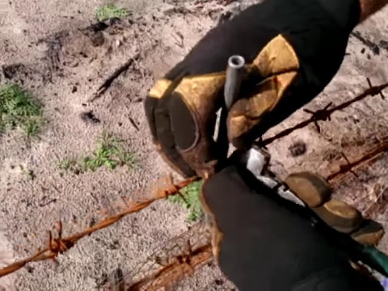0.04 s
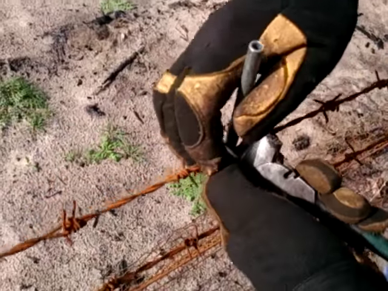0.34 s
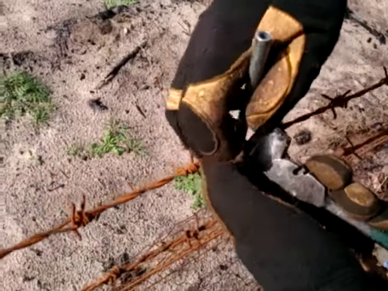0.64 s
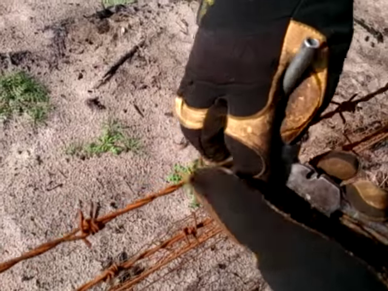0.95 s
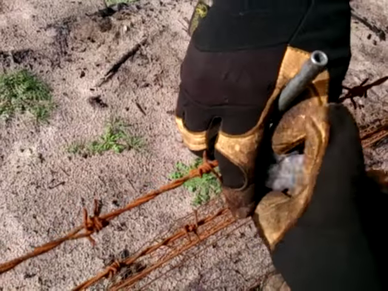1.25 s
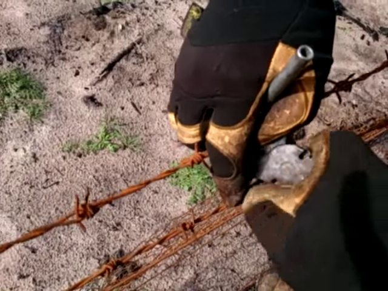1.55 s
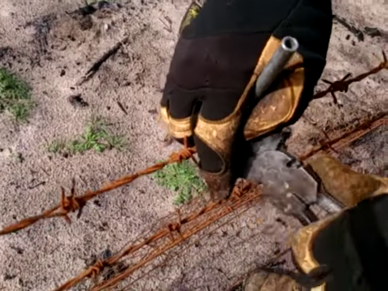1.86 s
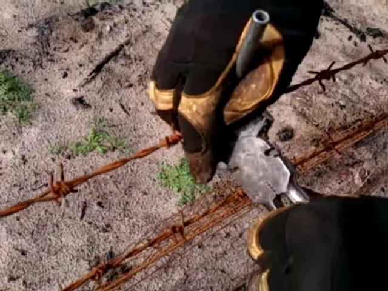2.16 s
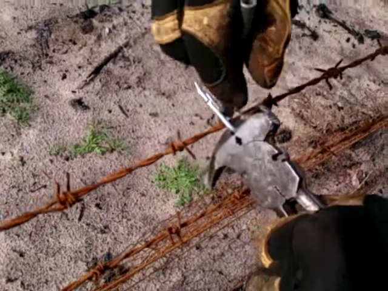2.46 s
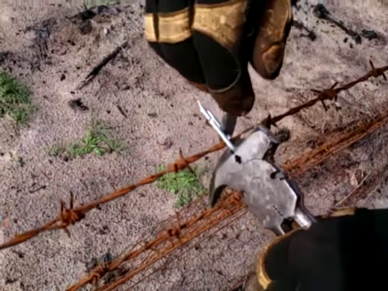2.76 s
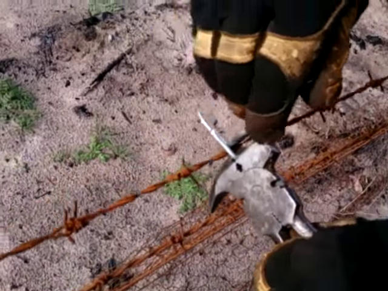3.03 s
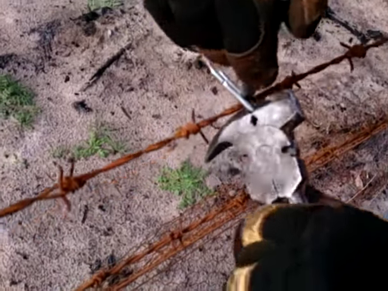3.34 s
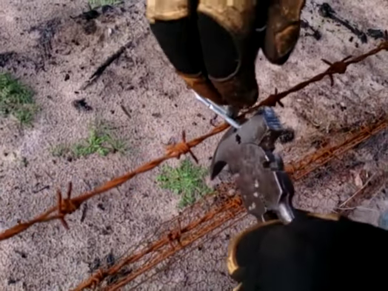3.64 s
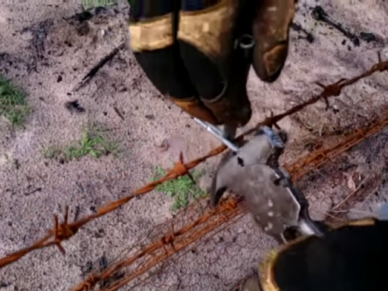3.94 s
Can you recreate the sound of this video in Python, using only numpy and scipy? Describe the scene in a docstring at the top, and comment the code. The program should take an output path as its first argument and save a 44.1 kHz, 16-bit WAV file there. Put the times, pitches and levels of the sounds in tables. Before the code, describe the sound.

Wind rumbles, thumps and pops on the microphone outdoors, mostly on the right. Under it, close by, steel pliers give small dry clicks on barbed wire and gloves rub softly. A distant bird whistles faintly twice.

```python
"""Wind over fence work.

Out in the open, wind rumbles, flutters, thumps and pops on the microphone's two ports, mostly the right.
Close by, under the buffeting, gloved hands work steel pliers and a wire clip on barbed wire: the steel
gives small dry clicks, the gloves rub and catch. Far off, a bird whistles twice over faint outdoor air."""
import sys
import numpy as np
from scipy import signal
from scipy.fft import rfft, irfft
from scipy.io import wavfile
from scipy.ndimage import uniform_filter1d, map_coordinates

SR = 44100
rng = np.random.default_rng(int(sys.argv[2]) if len(sys.argv) > 2 else 0)


def dump(signal):
    """Clip the signal to [-1, 1] and save it as 16-bit WAV at the path in sys.argv[1]."""
    limited = np.clip(np.atleast_2d(signal).T, -1, 1)
    pcm = np.round(limited * 32767).astype(np.int16)
    wavfile.write(sys.argv[1], SR, pcm)


N = 176400

# The wind's push on each microphone port. Each row: time in seconds, relative level in dB.
LEFT_PORT_PUSH = [(0, -23.5), (.09, -58), (.17, -40), (.3, -29.5), (.7, -34), (.95, -28), (1.2, -41.5),
                  (1.32, -24.5), (1.53, -31), (1.6, -33.5), (1.76, -61.5), (2.05, -42), (2.65, -34.5),
                  (2.9, -51.5), (2.99, -75), (3.13, -43), (3.28, -38), (3.42, -42.5), (3.65, -57),
                  (3.73, -38), (4, -40.5)]
RIGHT_PORT_PUSH = [(0, -22.5), (.22, -25.5), (0.332, -19), (.5, -20), (.66, -22.5), (.85, -20.5),
                   (.95, -22), (1.22, -31), (1.4, -22.5), (1.52, -28.5), (1.58, -45), (1.68, -40),
                   (1.74, -28), (1.95, -30.5), (2.109, -26), (2.151, -18), (2.28, -22), (2.319, -16.5),
                   (2.459, -22.5), (2.505, -22.5), (2.55, -14), (2.68, -34.5), (2.752, -52.5),
                   (2.92, -34.5), (3.134, -19.5), (3.29, -28.5), (3.432, -42.5), (3.571, -17), (3.651, -40),
                   (4, -30.5)]
# Eddies striking a port. Each row: centre in seconds, half-width in seconds, level in dB, port L or R.
EDDY_STRIKES = [(0.036, 0.0056, -17.5, "R"), (0.091, 0.021, -21, "L"), (0.098, 0.016, -18.5, "R"),
                (.137, .03, -23, "R"), (0.196, .015, -25.5, "R"), (0.232, 0.016, -29.5, "R"),
                (0.259, 0.018, -35, "L"), (.26, 0.012, -22, "R"), (0.282, 0.012, -21.5, "R"),
                (0.333, 0.018, -17, "R"), (0.331, 0.017, -22, "L"), (0.364, .012, -13, "R"),
                (0.394, 0.025, -24.5, "R"), (0.459, 0.021, -25.5, "R"), (0.488, 0.014, -31, "R"),
                (0.523, 0.03, -32, "L"), (0.528, 0.01, -23.5, "R"), (0.569, 0.02, -28, "L"),
                (.575, 0.029, -18, "R"), (0.614, 0.02, -15, "R"), (0.703, 0.02, -24.5, "R"),
                (0.763, .014, -26, "L"), (0.785, .018, -15, "R"), (0.788, 0.019, -26, "L"),
                (0.85, 0.025, -19, "R"), (0.903, 0.015, -25, "L"), (0.909, 0.013, -22.5, "R"),
                (0.929, 0.021, -18.5, "R"), (0.934, .015, -30, "L"), (0.988, 0.017, -25.5, "R"),
                (1.061, 0.016, -24, "L"), (1.137, 0.015, -29.5, "L"), (1.194, 0.015, -30.5, "L"),
                (1.24, 0.01, -64, "L"), (1.32, 0.019, -20.5, "L"), (1.39, 0.037, -25.5, "R"),
                (1.459, 0.022, -23, "L"), (1.494, 0.017, -25.5, "L"), (1.524, .013, -25, "L"),
                (1.728, 0.036, -23.5, "R"), (1.777, 0.013, -25.5, "R"), (1.815, 0.016, -28.5, "R"),
                (1.997, 0.021, -28.5, "R"), (2.074, .017, -32.5, "L"), (2.135, .02, -23, "R"),
                (2.203, 0.014, -40, "R"), (2.323, .032, -17, "R"), (2.366, .013, -21, "R"),
                (2.415, 0.02, -24, "R"), (2.476, 0.015, -30.5, "R"), (2.529, 0.015, -16.5, "R"),
                (2.594, 0.023, -23.5, "R"), (2.873, 0.021, -35.5, "L"), (3.01, 0.02, -29.5, "R"),
                (3.133, 0.032, -17, "R"), (3.142, .014, -31.5, "L"), (3.19, .014, -26.5, "R"),
                (3.213, 0.014, -22.5, "R"), (3.267, 0.036, -25.5, "R"), (3.266, 0.018, -30.5, "L"),
                (3.528, 0.025, -36.5, "R"), (3.569, 0.026, -29, "R"), (3.644, 0.0073, -23.5, "R"),
                (3.707, 0.016, -35, "L"), (3.779, .025, -35, "R"), (3.878, 0.011, -30, "R"),
                (3.942, 0.019, -39.5, "L")]
# Gusts slapping the right port. Each row: start in seconds, peak in dB, rise time in seconds.
GUST_THUMPS = [(0.319, -12, 0.0049), (.48, -2.5, 0.0044), (0.837, -5.5, 0.0045), (0.898, -5.5, 0.01),
               (2.123, -8, 0.0058), (2.294, -5, 0.0044), (2.364, -11, 0.0021), (2.405, -18.5, 0.0014),
               (2.514, -2, 0.0049), (2.533, -13, 0.0013), (2.581, -6.5, 0.0037), (3.182, -15, 0.005),
               (3.212, -16.5, 0.0023), (3.572, -10, 0.0025)]
# The hardest jolts on the right port. Each row: start in seconds, peak in dB, cut-off in Hz.
PORT_POPS = [(0.0404, -28.5, 720), (0.089, -21.5, 1490), (.258, -20, 970), (0.2832, -20, 980),
             (.3172, -19, 1400), (0.3244, -15, 12200), (.331, -10, 1340), (.338, -10.5, 1200),
             (.3672, -3.5, 11800), (.455, -28.5, 900), (.4875, -23, 8000), (0.6108, -14, 1040),
             (0.6112, -23.5, 11900), (0.7794, -24.5, 1010), (0.8414, -15.5, 10300), (.858, -26, 1000),
             (.904, -23.5, 990), (1.489, -31, 900), (2.128, -28, 795), (2.299, -20.5, 4070),
             (2.31, -21, 790), (2.32, -30, 686), (2.408, -27, 800), (2.505, -30, 7000), (2.529, -16, 2000),
             (3.116, -21, 950), (3.125, -15.5, 1100), (3.1428, -13.5, 3020)]
# The tone of a pop before its cut-off. Each row: frequency in Hz, gain in dB.
POP_SPECTRUM = [(100, -15.5), (400, 15.5), (850, 5), (1400, -6.5), (2200, -15), (4000, -23.5),
                (8000, -35.5), (12000, -38.5), (16000, -56)]

# Steel touching wire, close to the microphone. Each row: start in seconds, bright ring and low knock
# in relative dB, knock centre in Hz, left minus right in dB, contact decay time in seconds.
STEEL_CONTACTS = [(0.094, -53.5, -56, 2950, 16, .001), (0.194, -60, -57, 1700, 6, 0.00089),
                  (.682, -51, -65, 3000, 7, .0008), (.75, -53, -68, 3000, 4, 0.00077),
                  (.7652, -44, -48.5, 2180, -3, .002), (.902, -59, -52, 2940, -6, 0.0016),
                  (.964, -51.5, -61, 3050, -1, 0.00092), (1.032, -52, -51.5, 2020, 2, 0.0037),
                  (1.4075, -33, -45, 3500, 9, 0.00041), (1.42, -56, -48.5, 4940, 3, 0.0048),
                  (1.535, -39.5, -57, 4840, 5.5, 0.0023), (1.562, -48.5, -38, 1710, 0.5, 0.003),
                  (1.673, -38.5, -57, 1700, 11, 0.0011), (1.868, -44, -74, 3000, 10, 0.0027),
                  (1.984, -44, -53.5, 3430, -2.5, 0.0054), (2.034, -51, -64, 3000, 14, .001),
                  (2.064, -57.5, -69, 3000, 8, .001), (2.221, -67, -62, 1800, 6, .001),
                  (2.279, -54, -52, 1800, 1, 0.0028), (2.338, -47.5, -53, 4020, 11, 0.0088),
                  (2.353, -61, -41, 2190, -6, 0.0009), (2.5865, -38.5, -39.5, 4300, 1.5, 0.0029),
                  (2.667, -55, -43.5, 1400, 0, 0.0022), (3.029, -39.5, -33.5, 2030, 0.5, .0016),
                  (3.3885, -36.5, -48, 2500, -7, 0.002), (3.634, -79, -54, 2760, 12, 0.0037),
                  (3.649, -39.5, -40.5, 2700, 2, 0.0013)]
# Modes of the gripped pliers and taut wire. Each row: frequency in Hz, relative level in dB,
# seconds to fall by 60 dB.
GRIPPED_MODES = [(900, 4, 0.0089), (1480, 4.5, 0.0082), (2280, -1.5, 0.0035), (3050, 5.5, 0.0036),
                 (3920, 2.5, 0.0024), (4660, 11, 0.002), (5840, -19.5, 0.0017), (7270, 13.5, 0.01),
                 (8170, 6.5, 0.023), (8860, 12, 0.0079), (9480, 17, 0.0065), (10820, 16, 0.0025),
                 (12200, 3, 0.0034), (13200, 3, 0.0036), (14400, 7, 0.0038)]
# Gloves sliding on wire and steel. Each row: peak time, rise and fall in seconds, hiss level in dB,
# dull rub level in dB, left minus right of the hiss in dB.
GLOVE_STROKES = [(.33, 0.034, 0.056, -74, -60.5, 1), (.49, 0.026, 0.21, -75.5, -63, 0),
                 (.72, 0.07, 0.064, -65, -65.5, 9), (0.845, 0.0044, 0.0046, -70, -58, -6),
                 (.89, .02, 0.034, -78, -60, 12), (1.035, 0.011, 0.051, -56, -60, 9),
                 (1.42, 0.01, 0.0039, -49, -53.5, 19), (1.6, 0.13, 0.03, -78, -62, 14),
                 (1.68, 0.052, 0.063, -64.5, -56, 16), (1.864, 0.016, 0.017, -55, -61.5, 7),
                 (1.92, 0.028, 0.045, -58, -63, 14), (2.16, 0.019, 0.023, -69, -65, 11),
                 (2.26, 0.033, 0.03, -94, -74, -1), (2.343, 0.046, 0.048, -59.5, -57, 11),
                 (2.47, 0.027, 0.03, -61, -85, 14), (2.555, .02, .025, -61.5, -65, 4),
                 (2.62, 0.035, 0.022, -61, -80, 13), (3.04, 0.0094, 0.034, -81, -57, -5),
                 (3.147, .0015, 0.0061, -76, -58, -10), (3.42, 0.059, 0.024, -68.5, -96, 16),
                 (3.58, 0.025, 0.024, -66, -77, 19)]
# A glove dragging over twisted wire. Each row: start and end in seconds, catches per second, level in dB.
GLOVE_DRAGS = [(0.091, .2, 48, -69.5), (2.164, 2.37, 45, -64), (2.494, 2.593, 40, -59.5)]
# The tone of the gloves' hiss, rub and catches. Each row: frequency in Hz, relative density in dB.
HISS_SPECTRUM = [(2000, -21.5), (4400, 6.5), (6600, -0.5), (8000, 8), (9700, 13.5), (11000, 4),
                 (14500, -4.5), (16000, -10)]
RUB_SPECTRUM = [(300, 15.5), (900, 8), (1700, 7), (3000, 4.5), (4800, 0), (6500, -1.5), (12000, -12)]
CATCH_SPECTRUM = [(400, -2), (1100, 9.5), (1900, 3.5), (3000, -2.5), (4600, -14), (9000, -13), (16000, -57)]

# A distant bird. Each row: start and length in seconds, first and last pitch in Hz, level in dB.
BIRD_WHISTLES = [(2.007, .1, 1220, 1205, -58.5), (2.723, 0.205, 1426, 1310, -66.5)]
# The hiss of the open field. Each row: frequency in Hz, relative density in dB.
AIR_SPECTRUM = [(100, 26), (400, 6.5), (1000, 4), (2200, 0), (4800, -2.5), (6400, -6), (9500, -6),
                (13000, -12.5), (16000, -18)]

WIND_REF_DB = -22  # rumble and eddies brighten above this level and dull below it


def undb(db):
    """Decibels to gain."""
    return 10 ** (np.asarray(db) / 20)


def unit(x):
    """Scale to rms 1."""
    return x / np.sqrt(np.mean(x ** 2) + 1e-20)


def panned(db):
    """Left and right gains for a level difference, at constant power."""
    return unit(undb(np.array([[db], [-db]]) / 2))


def add(out, x, start_s):
    """Mix x into out from a given time."""
    i = int(start_s * SR)
    a, b = max(i, 0), min(i + x.shape[-1], N)
    out[..., a:b] += x[..., a - i:b - i]


def response(points, size):
    """Gain on the FFT grid from (Hz, dB) points."""
    hz, db = np.array(points).T
    return undb(np.interp(np.log(np.fft.rfftfreq(size, 1 / SR) + 1), np.log(hz), db))


def noise(points):
    """Coloured noise, unrelated left and right."""
    return unit(irfft(rfft(rng.standard_normal((2, N))) * response(points, N), N))


def wander(rate):
    """Smooth random drift of rms 1, with `rate` new values a second."""
    hold = max(int(SR / rate), 1)
    return unit(uniform_filter1d(rng.standard_normal(N)[np.arange(N) // hold], hold))


def wind_rumble(gain_db=2, flutter_db=5, knees_hz=(94, 31.4)):
    """Turbulence on each microphone port: the harder the wind pushes, the higher its spectrum reaches."""
    t, f = np.arange(N) / SR, np.fft.rfftfreq(N, 1 / SR)
    half_octaves_hz = 20 * 2 ** (np.arange(13) / 2)
    out = np.zeros((2, N))
    for port, curve in enumerate((LEFT_PORT_PUSH, RIGHT_PORT_PUSH)):
        times, push_db = np.array(curve).T
        push = undb(np.interp(t, times, push_db) + gain_db + flutter_db * wander(28))
        cutoff_hz = 60 + 107 * (push / undb(WIND_REF_DB)) ** 0.83
        turbulence = rfft(rng.standard_normal(N))
        total, power = 0, 0
        for hz in half_octaves_hz:
            in_band = np.abs(np.log2((f + 1) / hz)) < 1 / 4
            band = unit(irfft(turbulence * in_band, N))
            # The spectrum is flat below the port's knee and falls above it.
            gain = np.sqrt(hz) / np.hypot(hz, knees_hz[port]) * np.exp(-hz / cutoff_hz)
            total += gain * band
            power += gain ** 2
        out[port] = push * total / np.sqrt(power)
    return out


def wind_eddies(low_cut_hz=105.4, knee_hz=210, jolt_db=3, size=8192):
    """Patches of turbulence sweep past a port in jolts, fastest mid-way; strong ones are brighter."""
    out = np.zeros((2, N))
    t, f = (np.arange(size) - size // 2) / SR, np.fft.rfftfreq(size, 1 / SR)
    jolts = undb(jolt_db * wander(260))
    port_tone = f ** 2 / (f ** 2 + low_cut_hz ** 2) / np.hypot(f, knee_hz)
    for centre, half_width, db, port in EDDY_STRIKES:
        cutoff_hz = 280.6 * undb(db - WIND_REF_DB) ** 0.35
        spectrum = port_tone * np.exp(-(f / cutoff_hz) ** 1.185)
        patch = irfft(rfft(rng.standard_normal(size)) * spectrum)
        swell = (1 + (t / half_width) ** 2 / 2) ** -5
        span = (int(centre * SR) + np.arange(size)) % N
        push = swell * uniform_filter1d(jolts[span], size=64)
        travel = np.cumsum(push ** 0.26)  # a harder push carries the patch past faster
        swept = map_coordinates(patch, [travel], mode="wrap")
        eddy = unit(swept * push) * np.sqrt(np.mean(swell ** 2))
        add(out["LR".index(port)], undb(db) * eddy, centre + t[0])
    return out


def wind_thumps(size=4096):
    """A gust slaps the right port with a low thump: the pressure jumps, then sags back past rest."""
    out, t = np.zeros((2, N)), np.arange(size) / SR
    for start, db, rise in GUST_THUMPS:
        pulse = np.gradient((t / rise) ** 3 * np.exp(-1.5 * t / rise))
        add(out[1], -undb(db) * pulse / pulse.max(), start)
    return out


def wind_pops(wake_db=-2, wake_s=0.003, size=1024):
    """A sudden pressure jump in the right port with a rough wake, over within milliseconds."""
    out, k, f = np.zeros((2, N)), np.arange(size), np.fft.rfftfreq(size, 1 / SR)
    causal_fold = np.where(k == 0, 1, 2 * (k < size // 2))
    for start, db, cutoff_hz in PORT_POPS:
        spectrum = response(POP_SPECTRUM, size) / np.hypot(1, (f / cutoff_hz) ** 3)
        cepstrum = irfft(np.log(spectrum))
        jump = np.exp(rfft(cepstrum * causal_fold))  # minimum phase packs the energy at the front
        wake = rng.standard_normal(size) * np.exp(-k / SR / wake_s)
        roughness = 1 + undb(wake_db) * rfft(wake / np.linalg.norm(wake))
        pulse = irfft(jump * roughness)
        add(out[1], -undb(db) * pulse / np.abs(pulse).max(), start)
    return out


def plier_clicks(knock_below_hz=6000, spread_db=2.5, crack_db=-12, echo_s=0.011, size=6144):
    """Close up, a brief gritty contact rings the steel, and the gloved grip damps it at once."""
    out, t = np.zeros((2, N)), np.arange(size) / SR
    hz, mode_db, t60 = np.array(GRIPPED_MODES).T[:, :, None]
    low = hz[:, 0] < knock_below_hz
    for start, ring_db, knock_db, knock_hz, pan_db, contact_s in STEEL_CONTACTS:
        spread, detune, phase = rng.standard_normal((3, len(hz), 1))
        grit, scatter = rng.standard_normal((2, 2, size))
        contact = np.exp(-t / contact_s)
        force = unit(grit * contact)
        mode_hz = hz * (1 + 0.02 * detune)
        modes = np.exp(-np.log(1000) * t / t60) * np.sin(2 * np.pi * (mode_hz * t + phase))
        off_centre_db = -6.5 * low[:, None] * np.log2(hz / knock_hz) ** 2
        modes *= undb(mode_db + spread_db * spread + off_centre_db)
        knock = unit(signal.fftconvolve(force, modes[low].sum(0)[None])[:, :size])
        ring = unit(signal.fftconvolve(force, modes[~low].sum(0)[None])[:, :size])
        click = undb(knock_db) * knock + undb(ring_db) * (ring + undb(crack_db) * force)
        # Ground and fence scatter back a short tail: bright for the ring, dull for the knock.
        for tone, echo_db in ((HISS_SPECTRUM, ring_db - 15.5), (RUB_SPECTRUM, knock_db - 4)):
            echo = irfft(rfft(scatter) * response(tone, size), size) * np.exp(-t / echo_s)
            click += undb(echo_db) * unit(echo)
        add(out, click * np.sqrt(np.mean(contact ** 2)) * panned(pan_db), start)
    return out


def glove_rubs(grain_db=2.5, snag_db=1):
    """Leather and cloth slide near the microphone: hiss over a dull rub, gritty as fibres catch."""
    out, t = np.zeros((2, N)), np.arange(N) / SR
    hiss, rub = noise(HISS_SPECTRUM), noise(RUB_SPECTRUM)
    for peak, rise, fall, hiss_db, rub_db, pan_db in GLOVE_STROKES:
        slope_s = np.where(t < peak, rise, fall)
        stroke = np.exp(-np.abs((t - peak) / slope_s) ** 0.82)
        out += stroke * (undb(hiss_db) * hiss * panned(pan_db) + undb(rub_db) * rub)
    grit = unit(undb(grain_db * wander(900) + snag_db * wander(60)))
    return out * grit


def glove_catches(decay_s=0.0035, spread_db=2, max_catches=24, size=1024):
    """A glove sticks and slips over twisted wire in an uneven run of tiny dry catches."""
    envelope = np.zeros(N)
    catch = np.exp(-np.arange(size) / SR / decay_s)
    for start, end, rate, db in GLOVE_DRAGS:
        jitter, strengths = rng.standard_normal((2, max_catches))
        times = start + (np.arange(max_catches) + 0.25 * jitter) / rate
        run_rms = np.sqrt(np.sum(catch ** 2) * rate / SR)
        for time, strength in zip(times, strengths):
            if time < end:
                add(envelope, undb(db + spread_db * strength) * catch / run_rms, time)
    bursts = envelope * rng.standard_normal((2, N))
    return irfft(rfft(bursts) * unit(response(CATCH_SPECTRUM, N)), N)


def far_bird(waver=0.024, pan_db=-20.5):
    """Soft, wavering, slightly falling whistles from far off to the right."""
    out = np.zeros(N)
    for start, length, first_hz, last_hz, db in BIRD_WHISTLES:
        n = int(length * SR)
        hz = np.linspace(first_hz, last_hz, n) * (1 + waver * wander(120)[:n])
        swell = np.sin(np.linspace(0, np.pi, n))
        add(out, undb(db) * swell * np.sin(2 * np.pi * np.cumsum(hz) / SR), start)
    return out * panned(pan_db)


def open_air(left_db=-62.5, right_db=-58):
    """The faint, even hiss of the field all around."""
    return noise(AIR_SPECTRUM) * undb([[left_db], [right_db]])


def scene():
    """Wind right on the microphone, the handwork close by, the open field behind."""
    wind = wind_rumble() + wind_eddies() + wind_thumps() + wind_pops()
    handwork = plier_clicks() + glove_rubs() + glove_catches()
    return wind + handwork + far_bird() + open_air()


def record(dry, top_hz=15800):
    """The recorder clips at full scale and cuts the top treble steeply."""
    low_pass = signal.ellip(8, 0.2, 80, top_hz, fs=SR, output="sos")
    return signal.sosfilt(low_pass, np.clip(dry, -1, 1))


dry = scene()
out = record(dry)
dump(out)
```